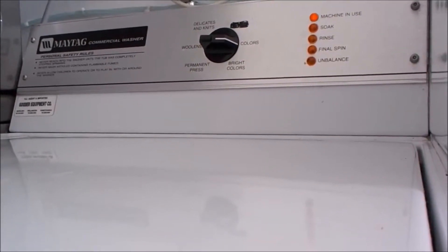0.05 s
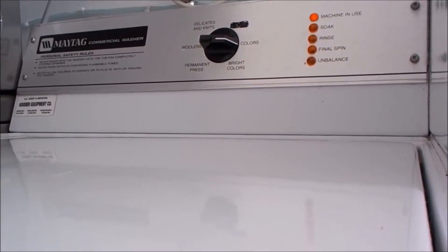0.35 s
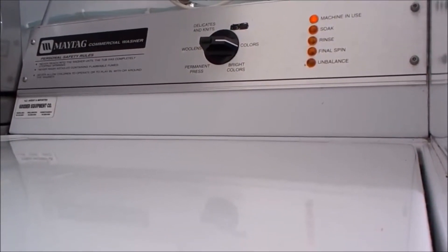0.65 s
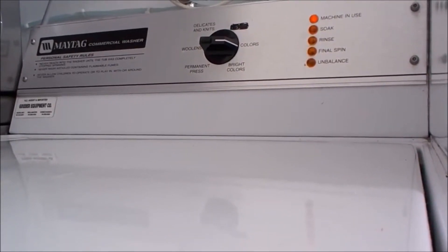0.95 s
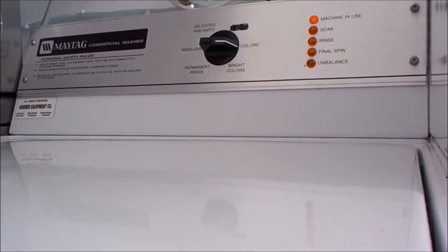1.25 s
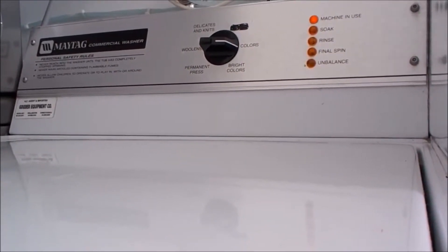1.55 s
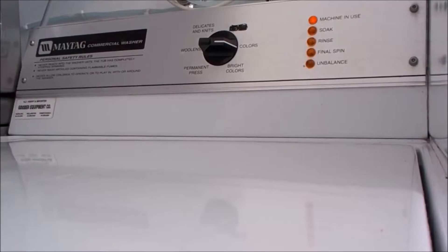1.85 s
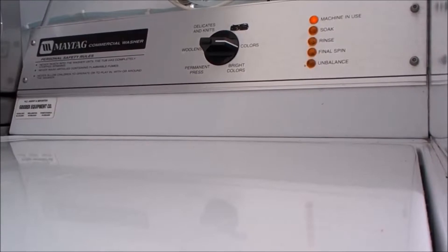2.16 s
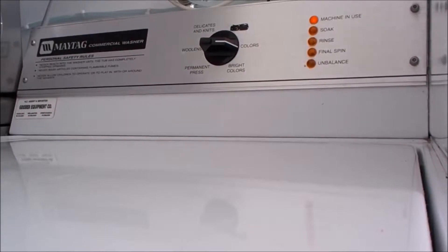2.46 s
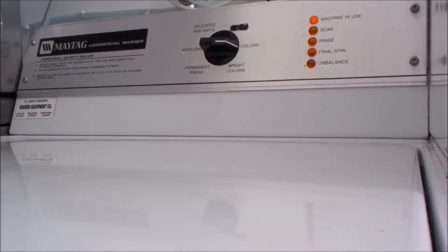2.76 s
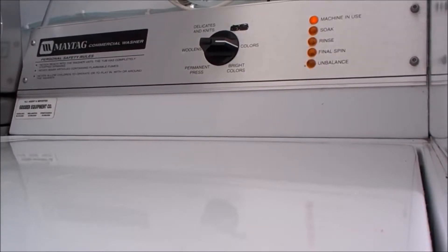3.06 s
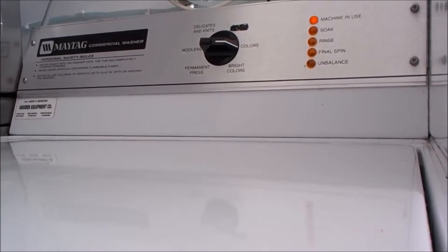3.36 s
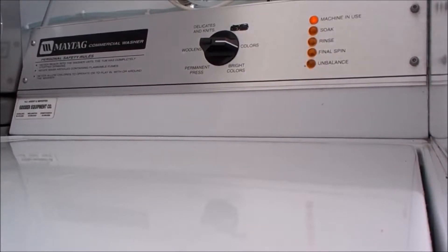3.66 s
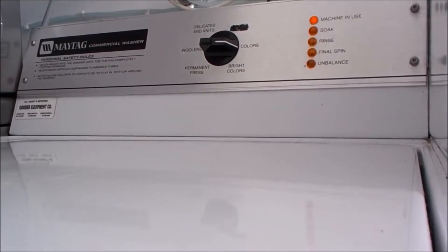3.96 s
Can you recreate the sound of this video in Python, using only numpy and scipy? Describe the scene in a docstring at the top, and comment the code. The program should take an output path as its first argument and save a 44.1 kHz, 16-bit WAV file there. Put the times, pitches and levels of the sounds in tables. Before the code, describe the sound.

A running washing machine, heard up close in a small laundry room, gives a continuous rush of water. Light splashes and gurgles come unevenly throughout, making the metal tub resonate, while the motor hums quietly underneath.

```python
"""Water rushes and spatters in the tub of a top-loading washing machine, close by in a small hard room.
Its flow and drop impacts make broadband noise; now and then it sloshes, splashes or gulps as air
pockets resonate. The water drives the tub wall and steel cabinet, which ring at their natural
frequencies. The motor hums underneath, and a faint hiss lies on top."""
import sys
import numpy as np
from scipy.fft import rfft, irfft
from scipy.io import wavfile
from scipy.ndimage import uniform_filter1d

SR = 44100
rng = np.random.default_rng(int(sys.argv[2]) if len(sys.argv) > 2 else 0)


def wav_out(sig):
    """Save sig, one row per channel (or a flat mono array), as 16-bit PCM at SR to the path in sys.argv[1]."""
    wavfile.write(sys.argv[1], SR, np.round(np.clip(np.atleast_2d(sig).T, -1, 1) * 32767).astype(np.int16))


N = 176400
TIME = np.arange(N) / SR
HZ = np.maximum(np.arange(N // 2 + 1) * SR / N, 1)


def from_db(db):
    """Amplitude ratio: a factor of ten for every 20 dB."""
    return 10 ** (np.asarray(db) / 20)


def rms_one(x):
    """Normalisation to unit mean power."""
    return x / np.sqrt(np.mean(x ** 2) + 1e-20)


def over_hz(points):
    """Interpolation along a logarithmic frequency axis."""
    hz, value = np.transpose(points)
    return np.interp(np.log(HZ), np.log(hz), value)


def swing_db(rows):
    """Deviation of a level curve from its time average."""
    db = np.interp(TIME, *np.transpose(rows))
    return db - db.mean()


def drift(rate_hz):
    """Slow random modulation: low-passed noise of rms 1."""
    return rms_one(irfft(rfft(rng.standard_normal(N)) / (1 + (HZ / rate_hz) ** 2), N))


def noise():
    """Uncorrelated white noise for mid and side."""
    return rng.standard_normal((2, N))


def colour(x, density):
    """Spectral shaping of unit white noise to a density in amplitude per root Hz."""
    return irfft(rfft(x) * density * np.sqrt(SR / 2), N)


def treble_cut(cutoff_hz=6890):
    """Steep low-pass filter that dulls the sound above about 6.9 kHz."""
    return 1 / (1 + (HZ / cutoff_hz) ** 80)


def swell(onset_s, attack_s, fade_s, hold_s=0.011):
    """Envelope of a damped vibration: a linear rise up to onset_s, a hold, an exponential decay."""
    rise = np.clip(1 + (TIME - onset_s) / attack_s, 0, 1)
    return rise * np.exp(-np.maximum(TIME - onset_s - hold_s, 0) / fade_s)


def ringing(hz, width_hz, span_s, evenness):
    """Forced resonance: noise through two like resonators in series; mid and side each of rms 1."""
    response = 1 / (1 + 1j * (HZ ** 2 - hz ** 2) / (HZ * width_hz * np.pi / 2)) ** 2
    ring = np.array([rms_one(x) for x in irfft(rfft(noise()) * response, N)])
    power = uniform_filter1d(ring ** 2, int(span_s * SR), axis=1)
    evened = ring / (np.abs(power) + 1e-6) ** (evenness / 2)  # steady drive fills the deepest fades
    return np.array([rms_one(x) for x in evened])


def hiss(from_hz=8370, flicker_db=0.7, flicker_hz=45):
    """Amplitude-modulated noise: a thin flickering hiss whose narrow peak is heard as a faint whistle."""
    # hiss spectrum: (frequency [Hz], density [dB per Hz])
    spectrum = [(8400, -116), (8900, -105), (10000, -100), (12000, -102), (14300, -105), (14650, -102),
                (14880, -85.5), (15080, -99), (15270, -98.5), (15450, -103), (15800, -103)]
    # hiss contour, taken about its mean: (time [s], level [dB])
    contour = [(0.0, -66), (0.4, -67), (1.1, -65.5), (1.75, -66), (2.09, -64.5), (2.4, -67), (2.51, -64),
               (2.58, -66), (2.68, -64), (2.96, -65.5), (4.0, -65.5)]
    steady = colour(noise(), from_db(over_hz(spectrum)) * (HZ > from_hz))
    return steady * from_db(swing_db(contour) + flicker_db * drift(flicker_hz))


def motor_hum(waver_db=2.5, waver_hz=4):
    """Harmonic vibration near multiples of twice the mains frequency, in left and right channels."""
    # motor partials: (frequency [Hz], level [dB], phase lag of the right channel [rad])
    partials = [(98.5, -70, .45), (200, -60, .1), (300, -56, 1.15), (400.7, -52.5, 0.47)]
    out = 0
    for hz, db, lag in partials:
        phase = 2 * np.pi * hz * TIME + rng.uniform(0, 2 * np.pi)
        amplitude = np.sqrt(2) * from_db(db - waver_db * drift(waver_hz))
        out = out + amplitude * np.sin([phase, phase - lag])
    return out


def cabinet_modes():
    """Normal modes: the water's steady drive keeps cabinet and tub ringing in narrow bands."""
    # steel resonances: (frequency [Hz], bandwidth [Hz], level [dB])
    modes = [(116, 6.7, -68), (176.2, 4.4, -65), (323.3, 12, -55.5), (367, 8.5, -47.5),
             (569.5, 13.4, -49.5), (762.4, 11, -52), (1492, 21, -48.5), (1915, 11, -60), (2145, 25, -45.5),
             (2084, 22, -52), (2248, 7.5, -49), (2265, 6.7, -48.5), (2310, 9, -49.5), (2310, 9, -53.5),
             (2377, 18, -53.5), (2790, 9, -58), (2798, 12, -52), (2850, 8.9, -57.5), (5286, 73, -65)]
    return sum(from_db(db) * ringing(hz, width_hz, span_s=0.17, evenness=0.43)
               for hz, width_hz, db in modes)


def panel_throb(rest_db=-58):
    """The lowest panel mode: the side of the cabinet booms softly in uneven pulses that add in power."""
    # panel pulses: (time [s], level [dB])
    pulses = [(.15, -50), (.355, -47), (1.16, -48), (1.25, -49.5), (1.35, -47), (1.73, -49.5), (1.85, -50),
              (1.96, -52.5), (2.27, -51), (2.37, -49), (2.53, -48), (2.73, -46.5), (2.98, -52), (3.15, -48),
              (3.35, -45), (3.46, -51), (3.73, -50.5)]
    power = from_db(rest_db) ** 2
    power += sum((from_db(db) * swell(s, attack_s=0.06, fade_s=0.048)) ** 2 for s, db in pulses)
    return np.sqrt(power) * ringing(hz=197.5, width_hz=9, span_s=0.06, evenness=1)


def panel_ring():
    """Forced vibration of one panel mode, louder and softer by turns."""
    # strength of the mode: (time [s], level [dB])
    contour = [(0, -47), (.3, -38.5), (.42, -49), (.88, -45.5), (.94, -37), (1.08, -48), (1.16, -38.5),
               (1.27, -48), (1.6, -43.5), (1.72, -44.5), (2.14, -39.5), (2.35, -47), (2.55, -55),
               (2.7, -41), (3.4, -41), (3.48, -45), (4, -40.5)]
    envelope = from_db(np.interp(TIME, *np.transpose(contour)))
    return envelope * ringing(hz=740, width_hz=10.4, span_s=0.066, evenness=0.8)


def tub_wall(rest_db=-43.5):
    """Forced vibration of the tub wall's main mode, which swells whenever water pushes against it."""
    # swells of the wall: (time [s], level [dB], attack [s], decay [s])
    pushes = [(.32, -34, 0.093, .1), (.85, -35, 0.029, 0.061), (.94, -32, 0.056, 0.073),
              (1.495, -36.5, .025, 0.049), (1.675, -32, 0.021, 0.02), (1.935, -36, .13, .05),
              (2.10, -35, 0.095, .03), (2.44, -43, 0.047, 0.045), (2.91, -36, 0.11, 0.024),
              (3.065, -37, .03, 0.044), (3.295, -37, 0.02, 0.096), (3.54, -36, 0.22, 0.045),
              (3.68, -36.5, .03, .025), (3.785, -35.5, .03, 0.085)]
    power = from_db(rest_db) ** 2
    power += sum((from_db(db) * swell(s, attack_s, fade_s)) ** 2 for s, db, attack_s, fade_s in pushes)
    return np.sqrt(power) * ringing(hz=1285, width_hz=16, span_s=0.035, evenness=0.73)


def gulps(attack_s=0.062, waver=0.02014, waver_hz=34.3):
    """Bubble resonance: each air pocket sounds one wavering note that glides as its size changes."""
    # air pockets: (time [s], level [dB], pitch [Hz], glide [Hz/s], decay [s])
    pockets = [(.17, -41.5, 372, -200, 0.086), (.58, -40, 367, -3, .045), (1.0, -40.5, 361.4, -3, 0.082),
               (1.059, -40.5, 535, -600, 0.031), (1.38, -37.5, 372, 2, 0.041), (1.82, -40.5, 367, 1, 0.034),
               (2.17, -39.5, 478, 1900.5, .028), (2.20, -41.5, 368, 0, .08), (2.20, -43, 566, 4, .05),
               (2.56, -40.5, 369, -1.5, .08), (3.001, -41, 367.5, 0.5, 0.045),
               (3.488, -40, 368.3, 1, 0.022)]
    out = 0
    for s, db, hz, glide, fade_s in pockets:
        pitch = hz + glide * np.clip(TIME - s, -attack_s, fade_s)
        pitch *= 1 + waver * drift(waver_hz)
        phase = 2 * np.pi * (np.cumsum(pitch) / SR + rng.random((2, 1)))
        out = out + np.sqrt(2) * from_db(db) * swell(s, attack_s, fade_s) * np.sin(phase)
    return out


def water_surges():
    """Transient excitation: water strikes the steel, and a band of noise swells and dies away."""
    # sloshes against the tub wall:
    # (time [s], level [dB], centre [Hz], bandwidth [Hz], attack [s], decay [s])
    sloshes = [(.32, -36, 1360, 150, 0.1, .05), (.495, -35, 984, 110, .02, .03),
               (.83, -41, 1300, 200, .03, 0.048), (.93, -41, 1240, 300, .03, 0.03),
               (1.09, -34, 1200, 200, 0.017, 0.07), (1.485, -27.5, 1390, 172, 0.014, 0.048),
               (1.90, -34.5, 1400, 190, 0.052, 0.088), (2.09, -36.5, 1190, 150, 0.054, 0.027),
               (2.665, -30, 1460, 130, 0.024, 0.056), (2.885, -36.5, 1570, 90, 0.064, .035),
               (3.45, -35, 1190, 110, 0.021, 0.083), (3.465, -33, 1506, 90, .025, 0.034),
               (3.675, -32, 1255, 110, 0.024, 0.019)]
    # brighter splashes rattling on the steel: same columns
    splashes = [(.63, -35, 2790, 220, 0.014, 0.021), (.82, -36, 2250, 110, 0.013, 0.043),
                (.97, -37, 2860, 300, 0.018, 0.02), (.98, -32, 2145, 45, 0.055, 0.032),
                (1.095, -33, 2850, 300, 0.013, .03), (1.34, -32.5, 2200, 120, 0.009, .015),
                (1.54, -33, 2440, 60, .01, .015), (2.01, -32, 2080, 70, .01, 0.023),
                (2.125, -34, 2380, 130, .01, 0.02), (2.305, -34.5, 2850, 350, .015, .025),
                (2.41, -33.5, 2190, 60, 0.013, .025), (2.555, -31.5, 2310, 70, 0.022, 0.058),
                (2.61, -33.5, 2730, 130, .02, 0.02), (2.68, -31.5, 2300, 80, 0.018, 0.022),
                (3.16, -50, 5200, 450, .015, 0.041), (3.455, -31, 2320, 120, 0.075, 0.014),
                (3.735, -30.5, 2153, 55, 0.014, 0.032), (3.795, -31, 2360, 130, .01, 0.017)]
    out = 0
    for s, db, hz, width_hz, attack_s, fade_s in sloshes + splashes:
        envelope = from_db(db) * swell(s, attack_s, fade_s)
        out = out + envelope * ringing(hz, width_hz, span_s=0.017, evenness=0.8)
    return irfft(rfft(out) * treble_cut(), N)


def room(x, t60_s=0.23, tail_db=0.5):
    """Reverberation: direct sound plus a diffuse exponential tail, uncorrelated in mid and side."""
    tails = noise() * from_db(-60 * TIME / t60_s)
    tails /= np.sqrt(np.sum(tails ** 2, axis=1, keepdims=True))
    return irfft(rfft(x) * (1 + from_db(tail_db) * rfft(tails)), N)


def spatter(drops_per_s=1500, size_db=3.0):
    """Shot noise: drops of uneven size land at random and reverberate in the room."""
    sizes = from_db(size_db * np.minimum(rng.exponential(1, N), 5))
    signs = rng.choice([-1, 1], N)
    lands = rng.random(N) < drops_per_s / SR
    return rms_one(room(sizes * signs * lands))


def water_rush(spatter_share=0.49, treble_hz=1850, treble_depth=0.57, flutter_db=1.17, flutter_hz=14):
    """Incoherent sources add in power: flow and spatter form one noise whose bands flutter separately."""
    # spectrum of the rushing water: (frequency [Hz], density [dB per Hz])
    spectrum = [(25, -104), (60, -102), (90, -93.5), (115, -88.5), (135, -88.5), (155, -79), (225, -78.5),
                (280, -72.5), (335, -66.5), (430, -70), (520, -65), (620, -70.5), (700, -66.5),
                (790, -63.5), (1080, -67.5), (1400, -66), (1700, -68), (1950, -64.5), (2200, -63.5),
                (2400, -64.5), (2850, -68.5), (3020, -73), (3220, -70.5), (3750, -81), (4700, -82.5),
                (5300, -83), (6000, -88.5), (6500, -97), (6900, -102)]
    # contour above treble_hz, its swing scaled by treble_depth: (time [s], level [dB])
    treble = [(0.0, -36), (0.11, -30.5), (0.76, -32), (0.87, -28), (1.1, -30.5), (1.22, -29), (1.48, -29.5),
              (1.8, -32), (1.92, -28), (2.24, -31.5), (2.5, -31), (2.65, -30), (2.96, -31.5), (3.3, -29),
              (3.35, -34), (3.46, -29.5), (3.55, -29), (3.79, -32), (4.0, -29)]
    # contour of the octave below treble_hz, taken about its mean: (time [s], level [dB])
    middle = [(0, 1), (.2, -1), (.35, -0.5), (.6, -1.5), (.95, 0), (1.25, -3), (1.42, 1.5), (1.55, -3),
              (1.75, 0), (1.95, -3.5), (2.2, -3), (2.55, -0.5), (2.7, -2.5), (2.9, -2.5), (3.0, -2.5),
              (3.5, -0.5), (3.61, -3.5), (3.72, -0.5), (4, -2.5)]
    flow = np.sqrt(1 - spatter_share) * noise() + np.sqrt(spatter_share) * spatter()
    density = from_db(over_hz(spectrum)) * treble_cut()
    band = np.floor(2 * np.log2(np.clip(HZ / treble_hz, 1 / 8, 3)))  # half octaves, wider at both ends
    treble_db, middle_db = treble_depth * swing_db(treble), swing_db(middle)
    out = 0
    for k in np.unique(band):
        level_db = flutter_db * drift(flutter_hz) + treble_db * (k >= 0) + middle_db * (-2 <= k < 0)
        out = out + colour(flow, density * (band == k)) * from_db(level_db)
    return out


def spread(mid_side):
    """Mid-side stereo: the side signal, in quadrature, partly decorrelates left and right."""
    # stereo width: (frequency [Hz], side gain [dB])
    width = [(30, -19), (75, -6), (115, -15), (200, -28), (270, -28), (320, -6), (380, -12), (560, -15),
             (1000, -23.5), (1600, -19), (2200, -11), (3100, -10.5), (4200, -10), (6500, -3.5),
             (10000, -8.5), (13500, -10.5), (14850, -1)]
    # stereo balance: (frequency [Hz], left minus right [dB])
    balance = [(60, -1.0), (130, 0.54), (290, 2.9), (640, -0.22), (1410, 1.3), (3100, -1.8), (6820, -1.0),
               (15000, 1.0)]
    mid, side = rfft(mid_side)
    side = side * from_db(over_hz(width))
    lean = from_db(over_hz(balance) / 2)
    return irfft(np.array([(mid + 1j * side) * lean, (mid - 1j * side) / lean]), N)


def scene():
    """Superposition of water, ringing steel, hiss and motor."""
    water = water_surges() + water_rush() + gulps()
    steel = tub_wall() + panel_ring() + panel_throb() + cabinet_modes()
    return spread(water + steel + hiss()) + motor_hum()


def record(dry, cutoff_hz=15800):
    """Notch and low-pass filtering: a few narrow bands cancel and the top is cut."""
    # bands of cancellation: (frequency [Hz], half-width [Hz], depth [dB])
    nulls = [(1765, 21.5, 21), (2553, 70, 20), (4996, 67, 32)]
    loss_db = sum(depth * np.exp(-((HZ - hz) / width) ** 2) for hz, width, depth in nulls)
    low_pass = 1 / (1 + (HZ / cutoff_hz) ** 400)
    return irfft(rfft(dry) * from_db(-loss_db) * low_pass, N)


dry = scene()
out = record(dry)
wav_out(out)
```